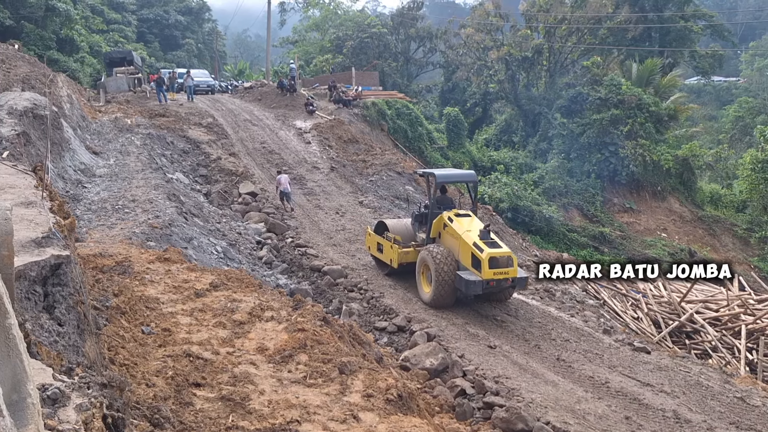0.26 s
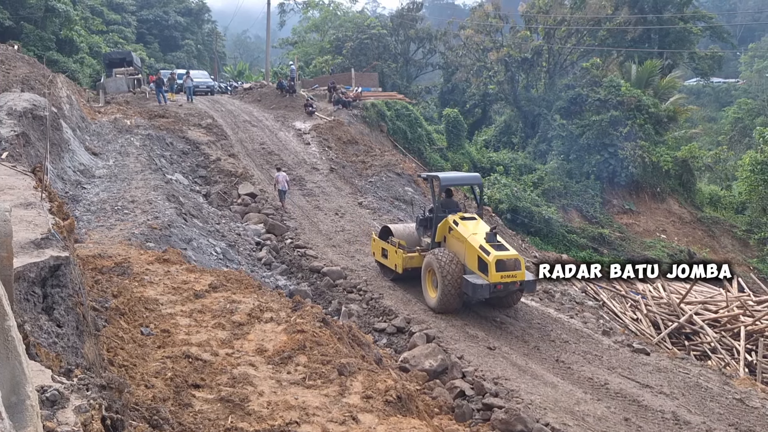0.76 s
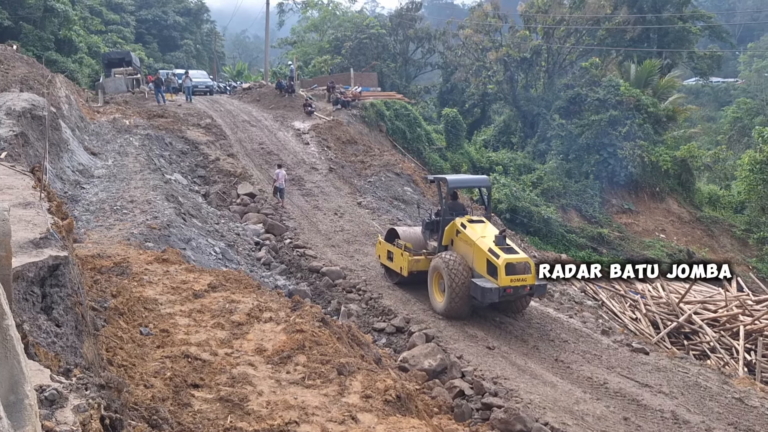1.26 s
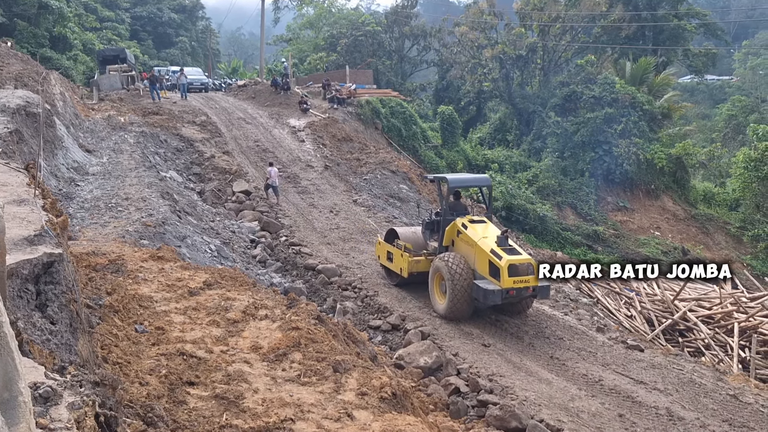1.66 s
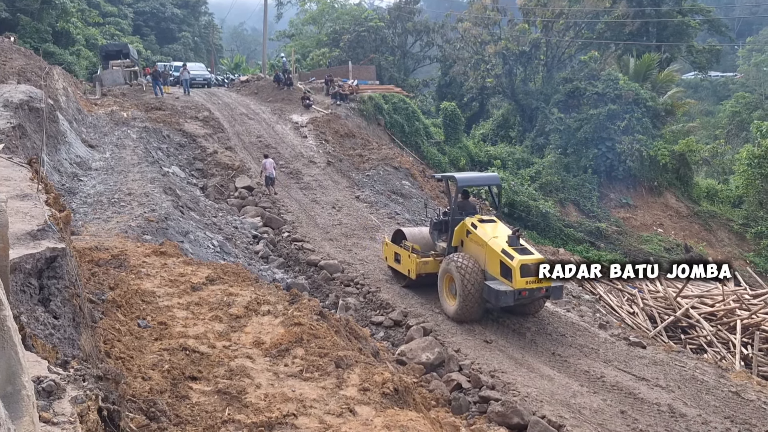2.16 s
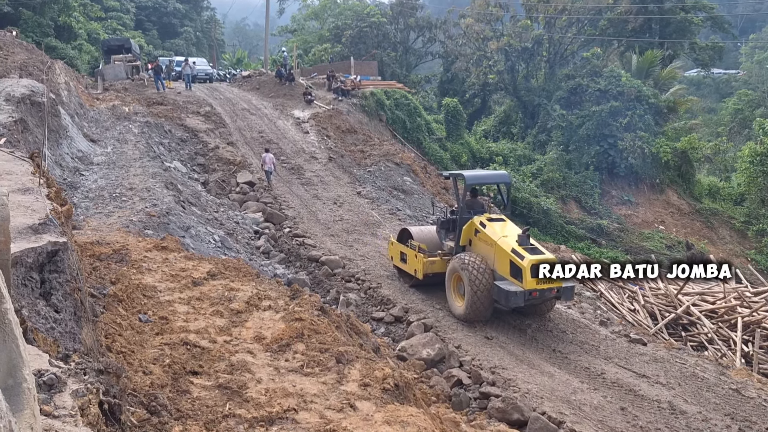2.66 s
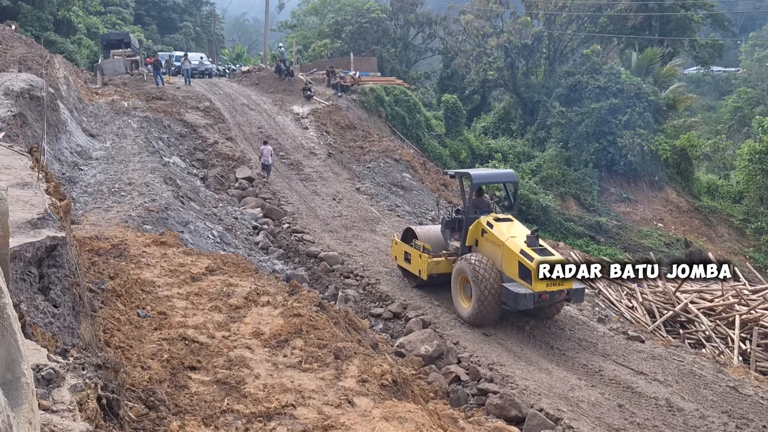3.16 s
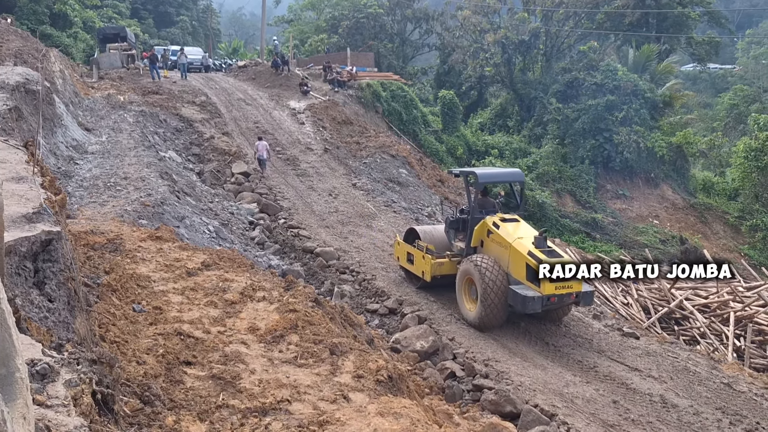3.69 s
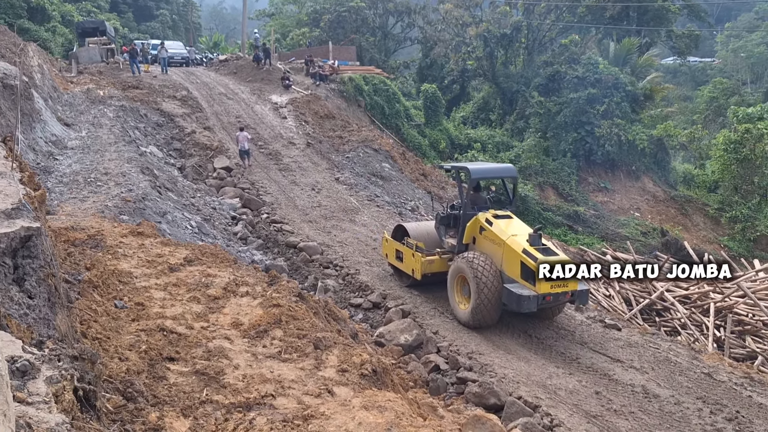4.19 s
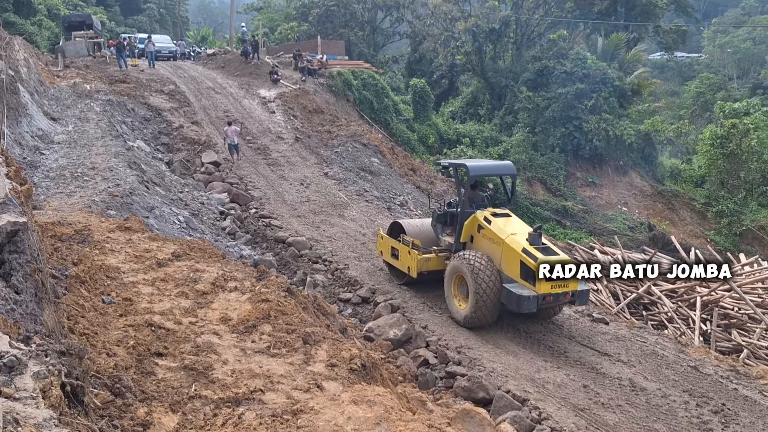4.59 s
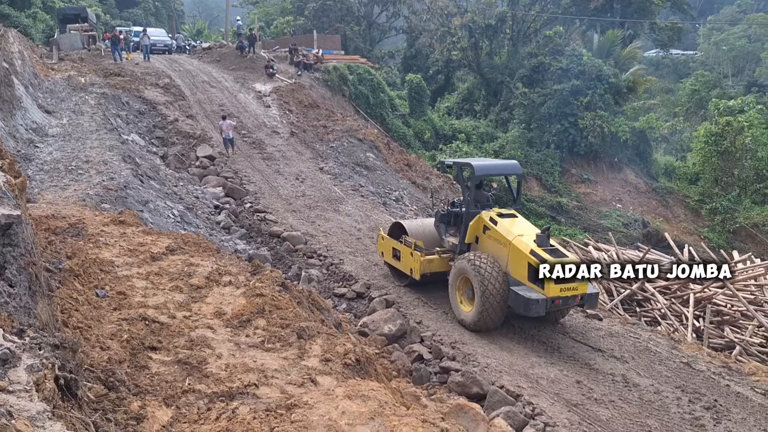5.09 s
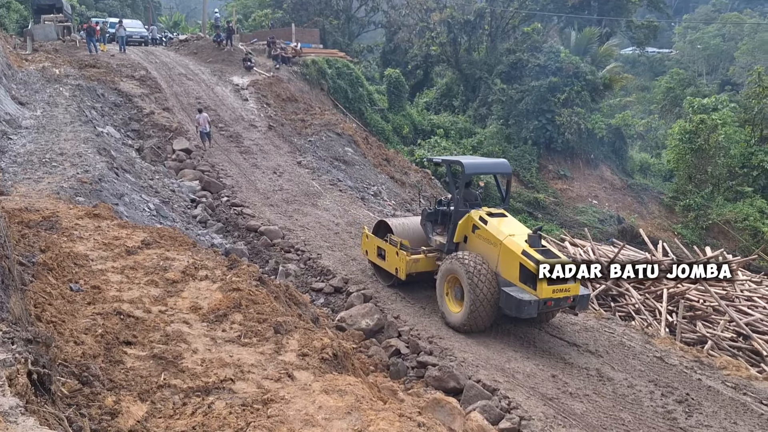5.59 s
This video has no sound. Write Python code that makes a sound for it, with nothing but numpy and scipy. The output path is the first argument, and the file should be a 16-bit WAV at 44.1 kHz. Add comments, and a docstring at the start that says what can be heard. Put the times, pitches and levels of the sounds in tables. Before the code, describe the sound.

The steady deep drone of a diesel road roller slowly nearing on a dirt road, stones cracking now and then, insects chirping faintly.

```python
"""First comes the hum and knock of a road roller's four-cylinder diesel, some way below the listener.
The exhaust hums each time a cylinder fires, the engine block knocks unevenly and the cover sings along.
Fan and valves hiss and clatter, louder as the roller nears, and its drum rumbles over the dirt road.
Soon insects chirp thinly in the verge, and stones crack and crunch under the drum."""
import sys
import numpy as np
from scipy import signal
from scipy.fft import rfft, irfft
from scipy.io import wavfile

SR = 44100
rng = np.random.default_rng(int(sys.argv[2]) if len(sys.argv) > 2 else 0)


def put_to_file(sound):
    """Save the sound as 16-bit audio at rate SR, in the file named by the first command-line argument."""
    columns = np.atleast_2d(sound).T  # one column per channel
    safe = np.clip(columns, -1, 1)
    whole_steps = np.round(safe * 32767)
    wavfile.write(sys.argv[1], SR, whole_steps.astype(np.int16))


N = 257544
TIME, FREQS = np.arange(N) / SR, np.fft.rfftfreq(N, 1 / SR)


def amp(db):
    """Turns decibels into a number to multiply by."""
    return 10 ** (np.asarray(db) / 20)

def unit(x):
    """Scales a signal to an average strength (rms) of 1."""
    return x / np.sqrt(np.mean(x ** 2) + 1e-20)

def over_time(points):
    """Joins a table's points into one value for every sample."""
    return np.interp(TIME, *np.transpose(points))

def over_freq(points):
    """Joins a table's points into one value for every frequency."""
    hz, value = np.transpose(points)
    return np.interp(np.log(FREQS + 1), np.log(hz + 1), value)

def peaks(modes):
    """The tone colour, in dB, of something that rings at a few pitches."""
    humps = (amp(db) / (1 + ((FREQS - hz) / width * 4 / 3) ** 2) for hz, width, db in modes)
    return 20 * np.log10(sum(humps))

def drift(hz):
    """A smooth random wobble, up to about this many times a second."""
    return unit(irfft(rfft(rng.standard_normal(N)) * np.exp(-(FREQS / hz) ** 2), N))

# how much louder the left side is than the right: f/Hz, level/dB
LEFT_LOUDER = [(60, 3), (110, 2.5), (250, 0.8), (700, -0.3), (1350, 1), (1900, -1.5), (2500, -11),
               (3600, -12), (5800, -10), (7000, -1), (8500, 1.5), (11000, -3.5), (13000, -10), (15200, 4)]
# how alike the two sides are: f/Hz, likeness/(0 to 1)
SIDES_ALIKE = [(100, 0.78), (850, 0.99), (1300, 0.83), (2500, 0.79), (4000, 0.8), (5200, 0.16),
               (7000, 0.56), (9000, .25), (15000, 0.15)]
# how far the left wave runs ahead of the right: f/Hz, phase/rad
LEFT_AHEAD = [(90, -.42), (200, -.15), (700, 0), (1150, .15), (1500, -.3), (2100, -.35), (3000, .7),
              (4400, 2.4), (5500, 2), (6200, 3.6), (8000, 4), (10000, 5.9), (12000, 6.2), (15000, 12)]

def stereo(direct, scattered, colour_db):
    """Colours a sound and spreads it over a left and a right microphone; their average has rms 1."""
    direct, scattered = rfft(direct), rfft(scattered)
    alike, side_db = over_freq(SIDES_ALIKE), over_freq(LEFT_LOUDER)
    left = (alike * direct + np.sqrt(1 - alike ** 2) * scattered) * np.exp(1j * over_freq(LEFT_AHEAD))
    pair = irfft(np.array([left * amp(side_db / 2), direct * amp(-side_db / 2)]) * amp(colour_db), N)
    return pair / np.sqrt(np.mean(pair.mean(0) ** 2))

def noise(envelope, colour_db):
    """Coloured stereo noise that swells and fades with the envelope."""
    return stereo(*(rng.standard_normal((2, N)) * envelope), colour_db)

# heavy going for the drum (negative = easier): t/s, drop in firing rate/Hz, build-up/s, recovery/s
DRUM_LOADS = [(.8, -.62, .22, 1.05), (2.1, -.45, .25, .28), (3.05, 1.25, .3, .35), (4.14, 1.75, .17, .31),
              (5.85, 1.0, .18, .2)]

def slowdown():
    """Firings lost per second: a load slows the engine, then its speed governor brings it back."""
    return sum(drop * np.exp(-((TIME - s) / np.where(TIME < s, build, recovery)) ** 2)
               for s, drop, build, recovery in DRUM_LOADS)

# the exhaust's main hum: t/s, level/dB
HUM_LEVEL = [(0.05, -14), (0.14, -15), (1.45, -17.5), (2.27, -15), (3.65, -16.5), (4.34, -14.5),
             (5.07, -16), (5.75, -15.5)]
# the tone an octave above the hum: t/s, level/dB
OCTAVE_LEVEL = [(0.05, -35), (0.59, -34.5), (1.07, -53), (1.2, -41), (1.88, -39), (2.2, -45.5),
                (3.35, -33.5), (3.5, -40.5), (4.55, -36), (5.08, -42.5), (5.32, -33.5), (5.78, -32.5)]
# other exhaust tones (quarter steps come from unequal cylinders): pitch/firing rate, level/dB
EXHAUST_TONES = [(.75, -43.5), (1.25, -42), (1.5, -45), (2.75, -54.5), (3, -44), (3.25, -50), (3.5, -61),
                 (3.75, -45), (4, -37.5), (4.25, -45), (5, -41.5), (5.25, -42), (6, -58), (6.25, -51.5),
                 (8.25, -55.5), (9, -49.5), (10, -48.5)]
# boost or cut for the deep ones among them: t/s, level/dB
DEEP_BOOST = [(0, -4), (1.3, -0.5), (2.2, -3.5), (2.9, -.5), (3.6, -3.5), (4.1, 4), (5.0, -1.5),
              (5.84, 2.5)]

def exhaust(firings, octave_db=0.5, deep_below=4.5, high_db=-1.5, flutter=0.014, waver=0.22, sway=0.19):
    """The silencer leaves a nearly pure hum at the firing rate, with weak wavering tones around it."""
    hum = amp(over_time(HUM_LEVEL)) * np.cos(2 * np.pi * firings) * (1 + flutter * drift(8))
    hum += amp(over_time(OCTAVE_LEVEL) + octave_db) * np.cos(2 * np.pi * (2 * firings + rng.random()))
    deep_db = over_time(DEEP_BOOST)
    for multiple, db in EXHAUST_TONES:
        gain = amp(db + (deep_db if multiple < deep_below else high_db)) * (1 + waver * drift(2.3))
        hum += gain * np.cos(2 * np.pi * (multiple * firings + rng.random()) + sway * drift(2.1))
    soft_ends = signal.windows.tukey(N, .002)
    pipe = rfft(np.sqrt(2) * soft_ends * hum)
    # both sides hear the same hum, the left a little louder and later
    side_db = over_freq(LEFT_LOUDER)
    left = amp(side_db / 2) * np.exp(1j * over_freq(LEFT_AHEAD))
    return irfft(pipe * np.array([left, amp(-side_db / 2)]), N)

# each cylinder's knock: delay/firing periods, level/dB
CYLINDER_KNOCKS = [(0.015, -1), (0.773, -5.5), (0.274, -2), (0.073, -1.5)]
# tone colour of the engine block: f/Hz, level/dB
BLOCK_COLOUR = [(150, -46), (230, 2.5), (340, 5), (420, 2.5), (490, -11.5), (570, -15), (660, 2.5),
                (770, -14), (845, 7), (1000, 4.5), (1150, -29), (1600, -15), (3000, -56)]
# where the engine cover rings: f/Hz, width/Hz, level/dB
COVER_RINGS = [(712, 55, -3), (774, 50, 0)]

def knocks(firings, ring_s=0.012, rise_s=0.0005, rough=0.98, jitter=0.023, uneven_db=1.4, pull_db=0.12):
    """Each cylinder rings block and cover, never twice the same, and harder as the engine speeds up."""
    t, shaking = np.arange(1024) / SR, np.zeros(N)
    ring = np.exp(-t / ring_s) * (1 - np.exp(-t / rise_s))
    cycles = np.arange(0, firings[-1], len(CYLINDER_KNOCKS))
    for k, (delay, db) in enumerate(CYLINDER_KNOCKS):
        late, size = rng.standard_normal((len(cycles), 2)).T
        at = np.searchsorted(firings, cycles + k + delay + jitter * late)
        blows = np.bincount(at, amp(db + uneven_db * size), N + 1)[:N]
        repeating = signal.oaconvolve(blows, ring * rng.standard_normal(len(t)))[:N]
        rattle = signal.oaconvolve(blows, ring)[:N] * rng.standard_normal(N)
        shaking += np.sqrt(1 - rough ** 2) * repeating + rough * rattle
    shaking, scattered = unit(shaking), rng.standard_normal(N)
    speed_gain = np.maximum(-np.gradient(slowdown()) * SR, 0)  # Hz per second
    block = amp(-38 - 0.26 * TIME) * stereo(shaking, scattered, over_freq(BLOCK_COLOUR))
    cover = amp(-53 + 2.5 * TIME) * stereo(shaking, scattered, peaks(COVER_RINGS))
    return amp(pull_db * speed_gain) * (block + cover)

# the cover's notes: pitch/firing rate, starting level/dB, change/(dB per s)
COVER_NOTES = [(12, -50, 1.6), (13, -45, -.9)]

def cover_song(firings, throb=0.48):
    """The cover sings along with the engine tones nearest its own pitch, throbbing unevenly."""
    song = np.zeros(N)
    for multiple, db, db_per_s in COVER_NOTES:
        gain = amp(db + db_per_s * TIME) * (1 + throb * drift(19))
        song += gain * np.cos(2 * np.pi * (multiple * firings + rng.random()))
    return np.sqrt(2) * song

# tone colour of fan and valves: f/Hz, level/dB
CLATTER_COLOUR = [(500, -4), (1200, -3.5), (1900, -1), (2150, -2), (2500, -1), (3200, -5.5), (4000, -7.5),
                  (5750, -13), (6500, -15), (7600, -19), (8600, -30), (10300, -30), (11800, -27.5),
                  (15500, -52)]
# rasp of the fan blades: f/Hz, width/Hz, level/dB
BLADE_RASP = [(2740, 700, 3.5), (3620, 530, -1)]
# air sizzling through the grille: f/Hz, width/Hz, level/dB
GRILLE_SIZZLE = [(5180, 260, 0), (5730, 300, -1)]
# fizz of the fuel injectors: f/Hz, level/dB
INJECTOR_FIZZ = [(7500, -35), (9000, -17), (10500, -8), (11100, 1), (12200, -1), (13500, 0), (15500, -15)]
# how sizzle and fizz rise and fall: t/s, level/dB
TREBLE_SWELL = [(0, -15), (1.5, -6.5), (2.3, 0), (3.2, -2.5), (4.2, -0.5), (5.84, -0.5)]

def fan_and_valves(firings, near_s=1.4, tick_db=5):
    """The fan hisses and the valves tick, pulsing with the engine and growing as the roller nears."""
    beat = np.cos(2 * np.pi * (firings - .65))
    cycle = np.cos(2 * np.pi * (firings / len(CYLINDER_KNOCKS) - .8))  # once per four firings
    pulsing = amp(-0.6 * beat + 0.52 * cycle + 0.8 * drift(250) + 0.52 * drift(10))
    nearness, treble_db = np.exp((TIME - TIME[-1]) / near_s), over_time(TREBLE_SWELL)
    clatter = amp(-36 + 3 * nearness) * noise(pulsing, over_freq(CLATTER_COLOUR))
    rasp = amp(-38) * nearness * noise(pulsing, peaks(BLADE_RASP))
    sizzle = amp(-48 + treble_db) * noise(pulsing, peaks(GRILLE_SIZZLE))
    ticking = pulsing * amp(tick_db * beat)
    fizz = amp(-65 + 7 * nearness + 0.73 * treble_db) * noise(ticking, over_freq(INJECTOR_FIZZ))
    return clatter + rasp + sizzle + fizz

# tone colour of drum and tyres: f/Hz, level/dB
RUMBLE_COLOUR = [(15, -20), (35, 1), (50, 6.5), (75, 4.5), (95, 3.5), (118, 1), (155, -6), (210, -2),
                 (290, -7), (380, -6), (490, -14), (750, -1), (1150, -15.5), (2500, -42)]

def rolling(level_db=-34, lumpy_db=1.0):
    """Drum and tyres rumble over the lumpy ground."""
    return amp(level_db) * noise(amp(lumpy_db * drift(38)), over_freq(RUMBLE_COLOUR))

# the nearest insects' chirps: t/s, level/dB, number of pulses
NEAR_CHIRPS = [(.943, -49, 2), (1.25, -47, 1), (1.903, -44, 1), (2.045, -39, 2), (2.108, -44.5, 2),
               (2.185, -39.5, 3), (2.386, -42, 3), (2.48, -44.5, 2), (2.634, -46, 1), (2.713, -41.5, 1),
               (2.966, -51, 1), (3.252, -45, 1), (4.294, -50, 1)]

def insects(pitch_hz=7520, wobble_hz=100, spread_hz=260, pulse_s=0.0029, gap_s=0.013, faint_count=14):
    """Insects chirp in one to three short pulses, some near, some faint, over a fading far chorus."""
    envelope = np.zeros(N)
    faint = [(.4 + 4.2 * when, -56.5 + 4 * size, 1 + length)
             for when, size, length in rng.random((faint_count, 3))]
    for s, db, pulses in NEAR_CHIRPS + faint:
        for k in range(round(pulses)):  # each pulse is 2 dB softer than the last
            envelope += amp(db + 1 - 2 * k) * np.exp(-.5 * ((TIME - s - k * gap_s) / pulse_s) ** 2)
    phase = 2 * np.pi * np.cumsum(pitch_hz + wobble_hz * drift(340)) / SR
    chirps = np.sqrt(2) * envelope * np.sin(phase) * amp([[-.7], [.7]])  # a little to the right
    band = np.exp(-.5 * ((FREQS - pitch_hz) / spread_hz) ** 2)
    hiss = irfft(rfft(rng.standard_normal((2, N))) * band, N)
    chorus = unit(hiss * amp(3.6 * drift(34)))
    return chirps + amp(-60 - 2 * TIME) * chorus

# stones under the drum: t/s, level/dB, rise/s, decay/s, hardness/(0 crunch to 1 crack)
STONE_BREAKS = [(0.874, -19, 0.0017, 0.021, 0.54), (1.412, -27, 0.012, 0.021, 0.028),
                (1.872, -25, 0.031, 0.05, 0.029), (1.918, -22.5, 0.0079, 0.024, 0.2),
                (1.968, -30, 0.01, .018, 0), (4.385, -32, 0.011, 0.044, 0.94),
                (4.515, -31, .004, 0.012, 0.8), (4.757, -23.5, 0.025, 0.025, 0.27)]
# tone colour of crunching gravel: f/Hz, level/dB
CRUNCH_COLOUR = [(40, -36), (170, -9), (320, 8), (500, -9.5), (740, 6), (1050, -7), (1500, -14.5),
                 (2400, -7.5), (3600, -18.5), (5000, -23), (7000, -27), (15000, -54)]
# where a cracking stone rings: f/Hz, width/Hz, level/dB
CRACK_RINGS = [(934, 190, 7), (1500, 79, 1), (1900, 130, 2), (2420, 400, 2), (4130, 110, -3),
               (4700, 140, 1), (6000, 320, -8), (9900, 8100, -32)]

def stones(grit_db=0.5):
    """A stone gives way in a gritty burst; hard ones crack and ring, loose ones crunch."""
    out, grit = np.zeros((2, N)), amp(grit_db * drift(400))
    crunch, crack = noise(grit, over_freq(CRUNCH_COLOUR)), noise(grit, peaks(CRACK_RINGS))
    for s, db, rise, decay, hard in STONE_BREAKS:
        burst = np.exp(np.minimum((TIME - s) / rise, (s - TIME) / decay))
        out += amp(db) * burst * ((1 - hard) * crunch + hard * crack)
    return out

def scene(firing_hz=63.95):
    """One running count of firings keeps the engine sounds in step; ground and insects join them."""
    firings = np.cumsum(firing_hz - slowdown()) / SR
    engine = exhaust(firings) + knocks(firings) + cover_song(firings) + fan_and_valves(firings)
    return engine + rolling() + stones() + insects()

def record(dry, top_hz=15750):
    """Cuts away the very highest treble."""
    low_pass = signal.firwin(801, top_hz, window=("kaiser", 9), fs=SR)
    return signal.oaconvolve(dry, low_pass[None], "same")


dry = scene()
out = record(dry)
put_to_file(out)
```